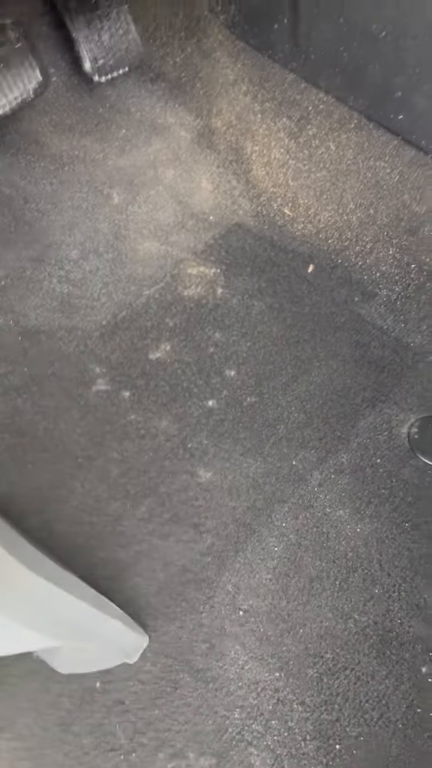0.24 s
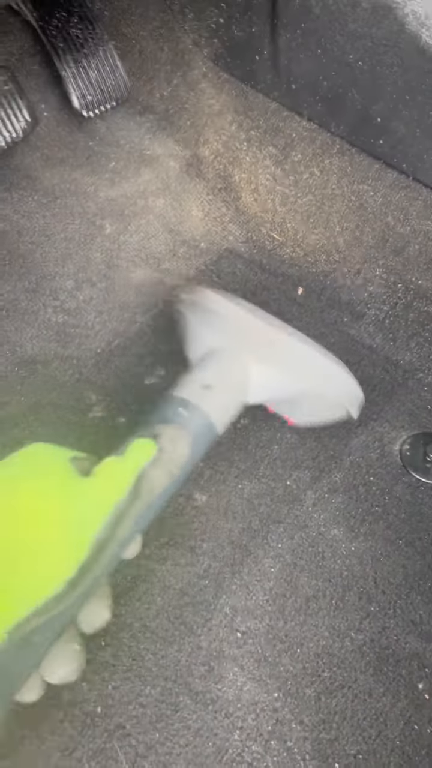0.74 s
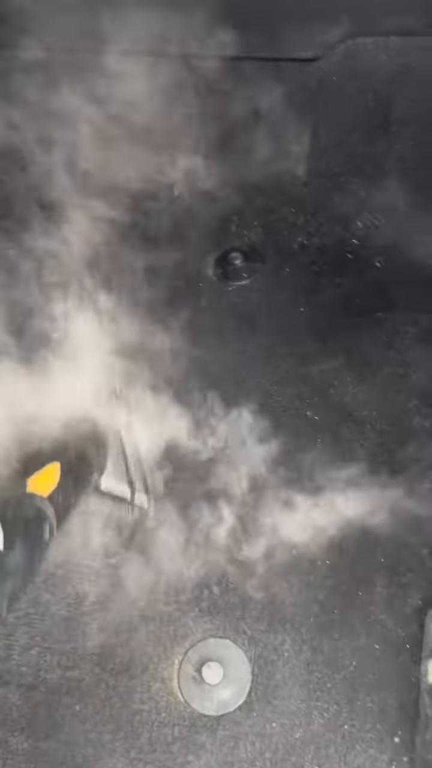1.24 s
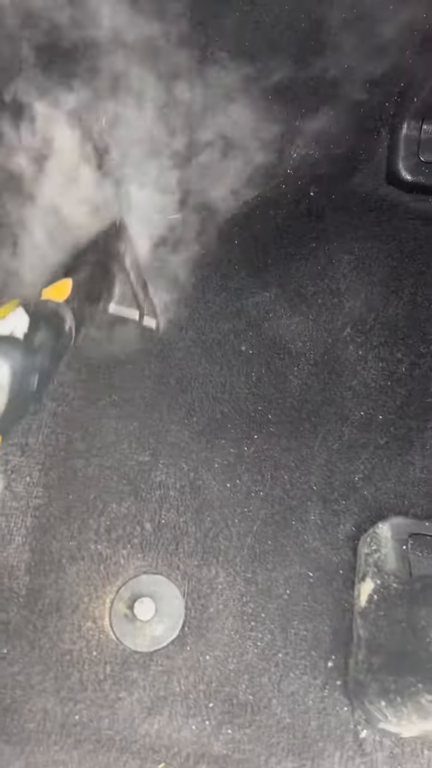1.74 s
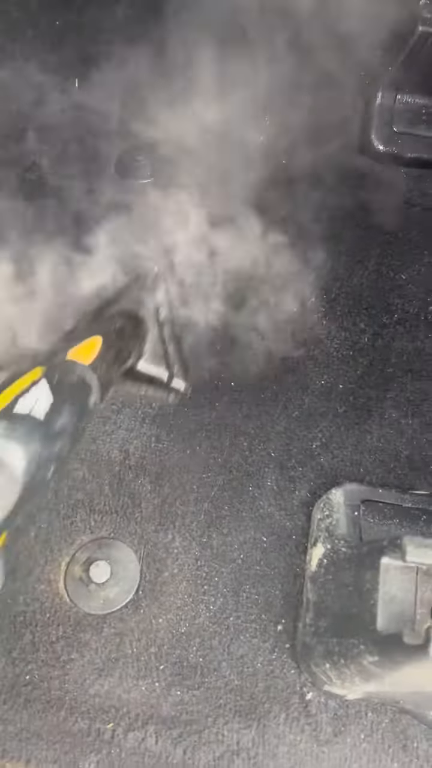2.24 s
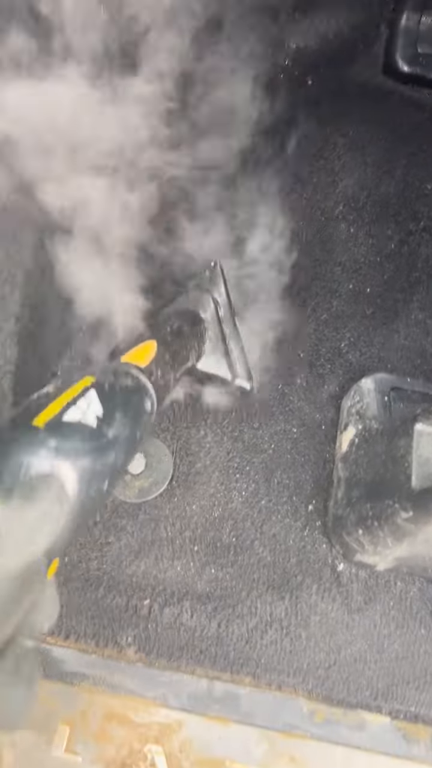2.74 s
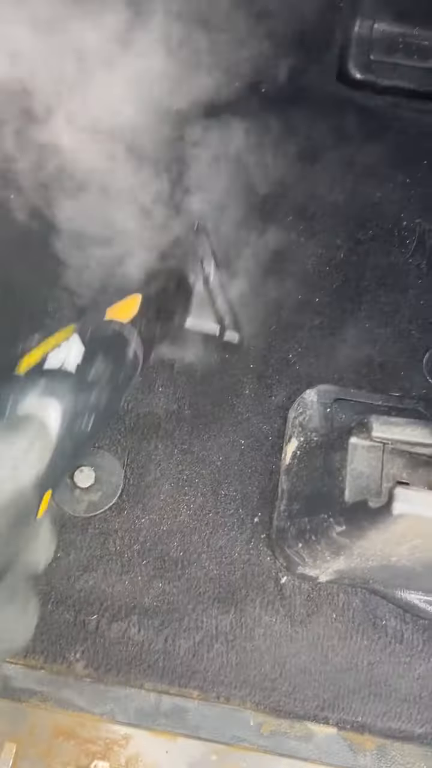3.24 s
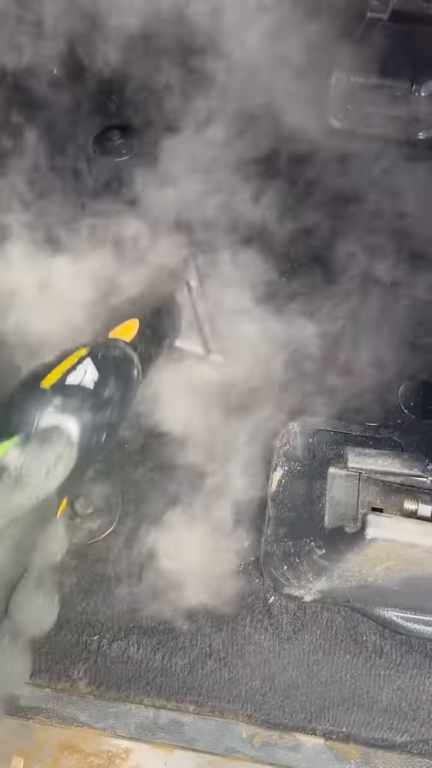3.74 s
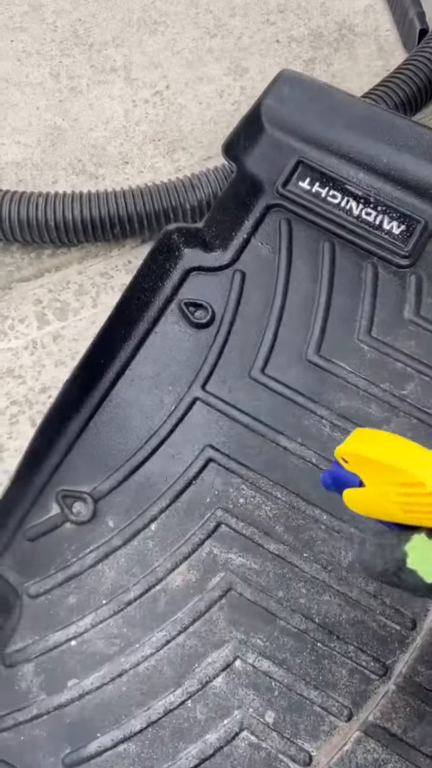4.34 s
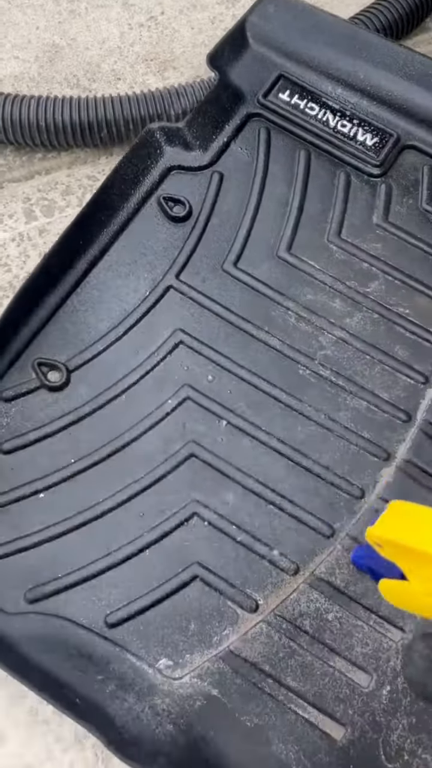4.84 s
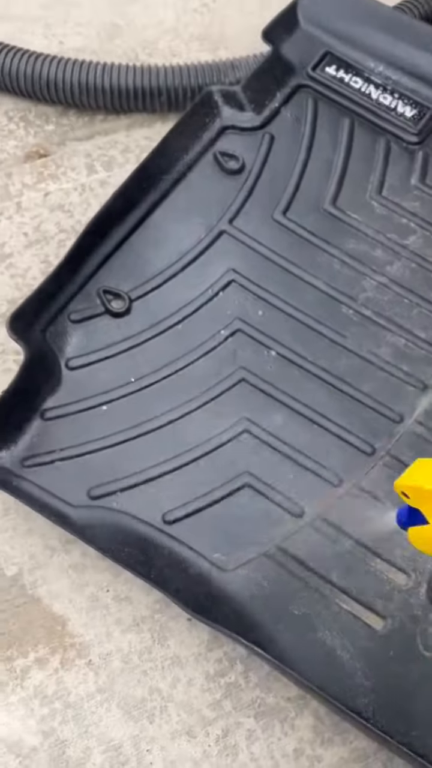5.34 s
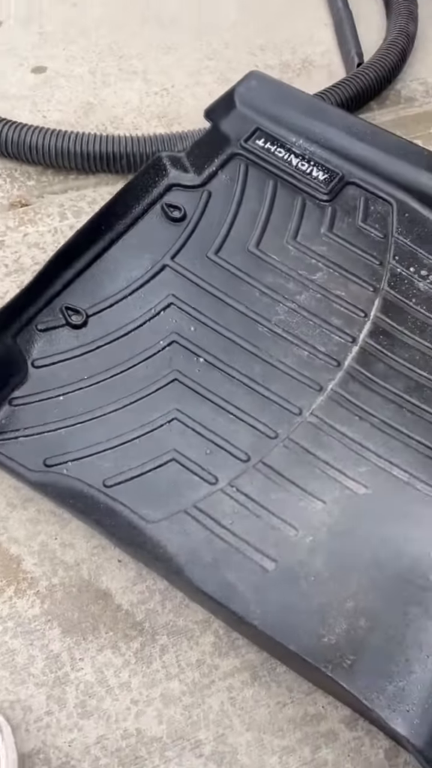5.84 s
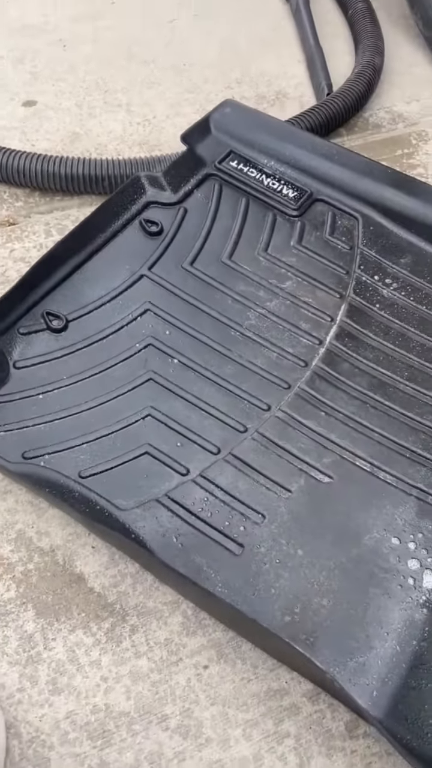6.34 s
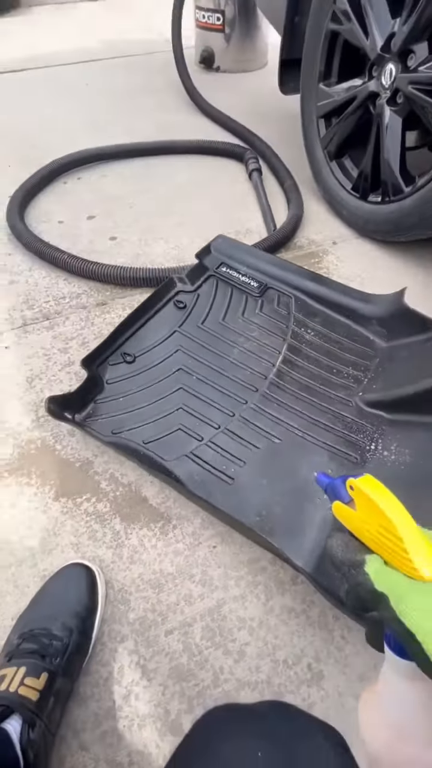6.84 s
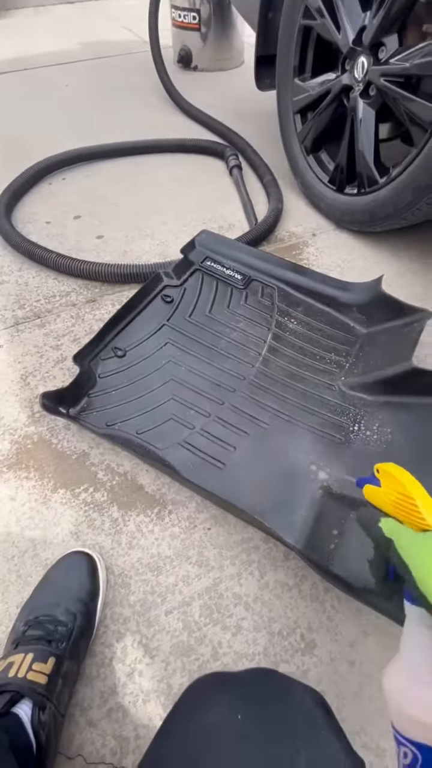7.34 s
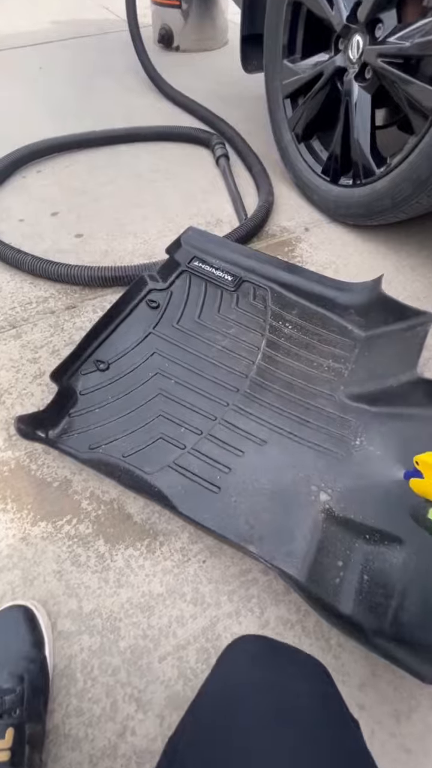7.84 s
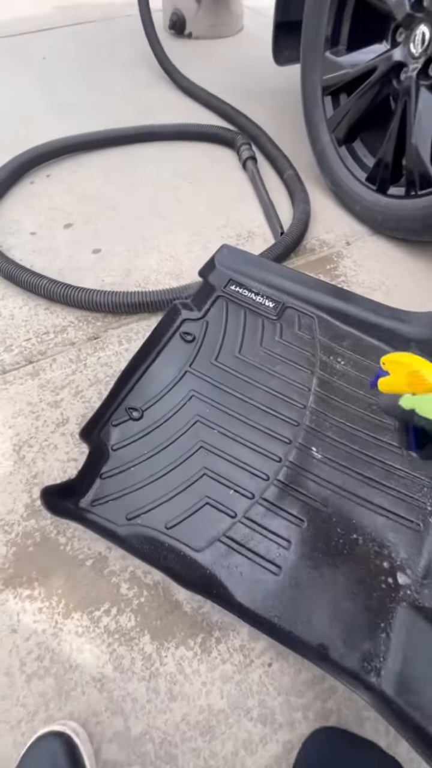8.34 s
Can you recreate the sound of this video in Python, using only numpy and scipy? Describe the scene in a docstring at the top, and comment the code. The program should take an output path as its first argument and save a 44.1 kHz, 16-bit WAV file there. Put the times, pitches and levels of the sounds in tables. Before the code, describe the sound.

Three close-miked cleaning jobs follow one another with hard cuts. First, under a second of vacuum air and faint motor hum over carpet; next, three seconds of forceful, sputtering steam in a footwell, its hiss swelling and shifting with each stroke; finally, an open yard where a trigger sprayer puffs mist, clicks back and fizzes as it refills, above low traffic, engine rumble and gusts buffeting the microphone.

```python
"""Cleaning a car, inside and out

Three places in turn. In the cabin a vacuum nozzle is drawn over the carpet: shaped noise and a motor tone.
In the footwell a steam brush scrubs: noise through combs that slide as the nozzle moves.
Outdoors a trigger bottle mists a rubber mat: swelling noise, with ringing modes for the close plastic knocks.
Behind it lie distant traffic, engine tones and wind on the two-port microphone."""
import sys
import numpy as np
from scipy import signal
from scipy.fft import rfft, irfft
from scipy.io import wavfile
from scipy.ndimage import uniform_filter1d

SR = 44100
rng = np.random.default_rng(int(sys.argv[2]) if len(sys.argv) > 2 else 0)


def file_out(sig):
    """Save sig as 16-bit WAV at sys.argv[1]."""
    # one column per channel
    cols = np.atleast_2d(sig).T
    # limit, then scale
    lim = np.clip(cols, -1, 1)
    pcm = np.round(lim * 32767).astype(np.int16)
    wavfile.write(sys.argv[1], SR, pcm)


N = 378378

TIME = np.arange(N) / SR
# noise is shaped in frames of 1024 samples, 256 apart
FRAME_S = np.arange(N // 256 + 5)[:, None] * 256 / SR
BIN_HZ = np.fft.rfftfreq(1024, 1 / SR)


# air in the vacuum hose, and air torn through the pile: (frequency [Hz], relative level per Hz [dB])
HOSE_SPECTRUM = [(25, -7), (70, -4), (250, -7.5), (480, -5.5), (650, -5.5), (1000, -9), (1220, -12.5),
                 (1500, -4.5), (1900, -12.5), (2500, -9.5), (4200, -20.5), (5800, -23), (8000, -19),
                 (15500, -28.5)]
PILE_SPECTRUM = [(150, -10), (450, -5), (700, -8.5), (1050, -5), (1800, -3), (2300, 5), (3100, 3),
                 (4100, -4.5), (5700, 2.5), (7800, -4.5), (9800, -1.5), (13500, -3), (15500, -4.5)]
# suction through the pile: (time [s], relative level [dB])
PILE_SUCTION = [(0.0, -35.5), (0.268, -31.5), (0.346, -25.5), (0.612, -23.5), (0.86, -24.5)]
# the nozzle mouth rings as its gap to the carpet changes:
# (time [s], spread in time [s], frequency [Hz], width [octaves], relative level [dB])
MOUTH_RINGS = [(0.193, 0.17, 1480, 0.095, -35.5), (0.363, 0.053, 1590, 0.13, -26.5),
               (0.434, 0.079, 1010, 0.18, -32), (0.605, 0.039, 2290, 0.094, -23),
               (0.702, 0.06, 2460, 0.082, -29), (0.836, 0.057, 1680, .22, -30.5)]
# vacuum motor: (frequency [Hz], level [dB])
MOTOR_TONES = [(330, -42)]


def vacuum():
    """Steady hose air and motor; the pile hisses when the nozzle meets it, and the mouth rings."""
    hose = amp(-35.0) * colour(HOSE_SPECTRUM)
    suction_db, = at_s(PILE_SUCTION, FRAME_S)
    contact = np.maximum(amp(suction_db) - amp(-40.5), 0)
    pile = amp(3.5) * contact * colour(PILE_SPECTRUM)
    mouth_power = 0
    for s, spread_s, hz, octaves, db in MOUTH_RINGS:
        mouth = amp(db) * swell(FRAME_S, s, spread_s) * unit(hump(hz, octaves))
        mouth_power = mouth_power + mouth ** 2
    uneven_db = 3.85 * patches(size=(26, 4))
    air = indoors(np.sqrt(hose ** 2 + pile ** 2 + mouth_power) * amp(uneven_db))
    motor = hum(MOTOR_TONES, drift=0.0012, flutter_db=0.4)
    return air * amp(0.86 * wander(94)) + motor


# steam jet: (frequency [Hz], relative level per Hz [dB])
JET_SPECTRUM = [(100, -18.5), (350.0, -17), (700.0, -13), (1100.0, -6.5), (1500.0, -2.5), (2000.0, -3.0),
                (2700.0, 0.0), (3200.0, -5.0), (3800.0, -10), (5000.0, -7.5), (6500.0, -7.5), (8200.0, -15),
                (10000.0, -9), (12500.0, -15.5), (13800.0, -17.5), (15500, -37)]
# loudness and colour of the jet: (time [s], relative level [dB], treble lift [dB], body lift [dB],
# lift of the rasp above 4 kHz [dB])
JET_COLOUR = [(0.89, -15.5, -7, 0.5, 3.5), (0.94, -12.5, -8, -5.5, -3.5), (1.05, -17.5, -1.5, 1, -0.5),
              (1.09, -23.5, -3, 4, 4.5), (1.16, -21.5, -2.5, 4.5, 0.5), (1.31, -20, 2.5, 5, 0),
              (1.42, -20.5, 0, 3.5, 0.0), (1.47, -24, 5, 9, -1.0), (1.56, -26.5, -1, 10, 4.5),
              (1.66, -25, 5, 8, 3), (1.73, -19, 0, -3.5, -1), (1.8, -18.5, -0.5, 1, 1),
              (1.93, -15.0, -4.5, -0.5, -6.5), (2.05, -15.5, -1.5, -2.5, -1.5), (2.1, -21, -5.5, 3.5, 2.5),
              (2.27, -18.5, -5.0, 0, 1), (2.38, -23.5, 3, 4, 1), (2.47, -26.5, 7, 2.5, 1),
              (2.56, -23.5, 1.5, 2.0, 1.5), (2.66, -18, -3, -4, -5.5), (2.79, -16.5, -6, -3.5, 2.0),
              (2.9, -21, -5, 0, -3), (3.0, -21, -3.5, 1.0, -2.5), (3.08, -28.5, 5, 3, 0.5),
              (3.15, -22.5, -3, -3, 0), (3.22, -20, -5, -3.5, -1), (3.33, -18, -3, -2, -3),
              (3.45, -18.0, -0.5, -3, 0.5), (3.56, -19, 0.5, -2, -0.5), (3.69, -21.5, -1, -0.5, -0.5),
              (3.8, -20.5, -0.5, -6, 0.5), (3.99, -21.5, 0, -3, 0.5)]
# hollow between brush and carpet, a peak with a notch under it: (time [s], peak [Hz], lift [dB])
BRUSH_HOLLOW = [(0.89, 2190.0, 3), (1.3, 2210.0, 2), (1.42, 2020.0, 3.5), (1.55, 2460.0, 4.5),
                (1.68, 1940.0, 7), (1.76, 1560.0, 0.5), (1.87, 1230.0, -2.0), (2.1, 1140.0, 2.5),
                (2.3, 1370.0, 0), (2.45, 1710.0, 8), (2.58, 1500.0, 0.5), (2.8, 1330.0, -1.5),
                (3.0, 1720.0, 0.5), (3.1, 1770.0, 1), (3.25, 2160.0, 2), (3.5, 2160.0, 3.0),
                (3.7, 2100.0, 2.5), (3.99, 1880.0, 2.5)]
# the jet whistles faintly on the brush's edge: (time [s], spread in time [s], frequency [Hz], lift [dB])
EDGE_WHISTLES = [(1.01, 0.044, 5000, 10), (1.09, 0.049, 4600, 5), (1.24, 0.086, 4250, 7),
                 (1.98, 0.032, 5020, 14), (2.798, 0.044, 5300, 3), (3.898, 0.044, 4230, 9)]
# strokes of the brush: (time [s], lag of the reflection off the footwell [ms])
STROKE_LAGS = [(0.89, 1.65), (1.05, 1.74), (1.32, .97), (1.42, .5), (1.55, .53), (1.68, .55), (1.78, 1.27),
               (1.9, 1.8), (2.04, 2.0), (2.16, 1.8), (2.33, 1.37), (2.45, 1.15), (2.56, 1.21), (2.72, 1.76),
               (2.84, 2.08), (3.1, 1.56), (3.27, 1.83), (3.48, 2.2), (3.68, 1.84), (3.85, 1.61),
               (3.99, 1.8)]
# clouds of steam reaching the microphone: (time [s], level [dB], spread in time [s])
STEAM_PUFFS = [(1.047, -35, 0.1), (1.3, -34, 0.037), (1.44, -33, 0.042), (1.77, -43, 0.089),
               (2.007, -35.5, 0.028), (2.15, -35.5, 0.031), (2.675, -33, 0.05), (3.674, -27, 0.05)]


def steam():
    """A sputtering jet; its reflections make combs that slide with the nozzle."""
    jet_db, treble_db, body_db, rasp_db = at_s(JET_COLOUR, FRAME_S)
    treble = 1 / (1 + (5200 / (BIN_HZ + 1)) ** 4)
    tilt_db = treble_db * treble + body_db * hump(440, 1.0) + rasp_db * hump(4600, 0.31)
    hollow_hz, lift_db = at_s(BRUSH_HOLLOW, FRAME_S)
    hollow_db = lift_db * (hump(hollow_hz, 0.18) - 1.1 * hump(0.63 * hollow_hz, 0.25))
    whistle_db = sum(db * swell(FRAME_S, s, spread_s) * hump(hz, 0.03)
                     for s, spread_s, hz, db in EDGE_WHISTLES)

    lag_ms = uniform_filter1d(at_s(STROKE_LAGS, FRAME_S)[0], size=9, axis=0)
    turn = 2j * np.pi * BIN_HZ * lag_ms / 1000
    # the footwell wall reflects the middle of the hiss best
    near = 0.38 * hump(2300, 1) * np.exp(turn)
    # later reflections from the cabin, each path lengthening or shortening as the nozzle moves
    paths = zip(rng.uniform(.002, .012, size=14), rng.uniform(0, 1.5, size=14))
    echoes = sum(np.exp(2j * np.pi * BIN_HZ * lag_s + slide * turn) for lag_s, slide in paths)
    far = .14 * hump(3800, 1.8) * echoes

    swirl_db = 1.8 * patches(size=(20, 3))
    # coarse eddies, strongest in the rasp of the jet
    eddies_db = (.8 + 1.4 * hump(3600, .7)) * patches(size=(5, 14))
    shape_db = jet_db + tilt_db + hollow_db + whistle_db + swirl_db + eddies_db
    jet = indoors(colour(JET_SPECTRUM) * abs(1 + near) * abs(1 + far) * amp(shape_db - 1.33))
    # droplets of condensate break up the jet, and it surges unevenly
    sputter_db = 0.7 * wander(125)
    surge_db = 0.6 * wander(31)
    # a draught of -47 dB blows between the clouds
    return jet * amp(sputter_db + surge_db) + buffets(gusty(-47, STEAM_PUFFS))


# atomised spray: (frequency [Hz], relative level per Hz [dB])
MIST_SPECTRUM = [(500, 1.5), (1000, 0.5), (1700, -7.5), (2600, 4), (3800, -1), (5400, -6.5), (6700, 0),
                 (8200, -1), (10000, -2), (15500, 1)]
# one squeeze a row: (time of full pressure [s], relative level [dB], rise [s], fall [s],
# sizzle lift near 5 kHz [dB], patter on the mat [dB], patter frequency [Hz])
SPRAY_SQUEEZES = [(4.115, -31.5, 0.12, 0.062, 7, -12.5, 1800), (4.64, -32, 0.1, 0.075, 8, -12, 1550),
                  (5.22, -32.5, 0.11, 0.092, 9, -10.5, 1730), (5.755, -34, 0.076, 0.068, 7.5, -7.5, 1050),
                  (7.19, -35, 0.099, 0.084, 8, -14, 1437), (7.731, -36.5, 0.081, 0.11, -3.5, -14.5, 1510),
                  (8.094, -36, 0.076, 0.059, 3, -14.5, 1605), (8.441, -38.5, 0.087, 0.079, 8.5, -10, 1530)]


def spray():
    """Each squeeze swells into a hiss of mist, and the droplets patter on the mat."""
    power = 0
    for s, db, rise, fall, sizzle_db, patter_db, patter_hz in SPRAY_SQUEEZES:
        u = (FRAME_S - s) / np.where(FRAME_S < s, rise, fall)
        flow = amp(db) / (1 + abs(u) ** 3 + (u / 1.5) ** 10)
        mist = amp(-5.5 + sizzle_db * hump(5270, 0.22)) * colour(MIST_SPECTRUM)
        patter = amp(patter_db) * unit(hump(patter_hz, 0.8))
        power = power + flow ** 2 * (mist ** 2 + patter ** 2)
    uneven_db = 1.2 * patches(size=(20, 4)) + 1.6 * patches(size=(3, 16))
    # the hiss bounces off the mat, close under the nozzle
    bounce_ms = 0.61
    bounce = 0.27 * hump(3600, 1) * np.exp(2j * np.pi * BIN_HZ * bounce_ms / 1000)
    return outdoors(np.sqrt(power) * abs(1 + bounce) * amp(uneven_db)) * amp(0.4 * wander(200))


# creaks of the pulled trigger: (time [s], relative level [dB], slips in the run, gap between slips [s])
TRIGGER_CREAKS = [(4.419, -30, 1, 0), (4.444, -32, 2, .008), (4.951, -27, 1, 0), (4.974, -40, 1, 0),
                  (5.001, -28.5, 2, 0.0088), (5.569, -38, 1, 0), (5.638, -40, 2, 0.016), (6.002, -43, 1, 0),
                  (7.01, -41, 2, 0.03), (7.356, -46, 1, 0), (7.533, -43, 1, 0), (7.565, -29, 1, 0),
                  (7.586, -29.5, 2, .018), (7.98, -27, 3, 0.012), (8.328, -33.5, 1, 0),
                  (8.344, -27.5, 3, 0.0092)]
# knocks of the trigger: (time [s], head relative level [dB], pitch factor of head and stop,
# bottle relative level [dB], stop relative level [dB])
TRIGGER_KNOCKS = [(4.2315, -26.5, 0.97, -42, -31), (4.236, -31, 0.98, -45, -33),
                  (4.709, -42, 1.0, -30, -52), (4.732, -29, 0.874, -31, -50), (4.7352, -41, 1.0, -34, -50),
                  (4.76, -42, 1.05, -37, -48), (5.322, -31, .97, -36, -41), (5.355, -26.5, 1.03, -50, -37),
                  (5.359, -40, 1.2, -49, -44), (5.402, -53, 1.2, -33, -61),
                  (7.0108, -32, 1.03, -33.5, -23.5), (7.389, -44, 1.0, -36, -58),
                  (7.396, -45, 0.89, -37, -55), (7.469, -54, 1.1, -33, -52), (7.55, -39, 1.14, -35, -41),
                  (7.586, -44, 0.9, -49, -45), (7.981, -36, .95, -40, -46), (8.004, -38, .95, -43, -48),
                  (8.346, -37, 0.97, -39, -45), (8.365, -37, .9, -35, -48), (8.549, -26, 0.95, -47, -35)]
# modes of the pivot, its stop, the spray head and the half-full bottle:
# (frequency [Hz], relative level [dB], time to fall 60 dB [s])
PIVOT_MODES = [(1100, -18, .012), (1570, -6, .012), (2400, -19, 0.006), (5500, -7, 0.02),
               (6660, 5.5, 0.016), (8400, -1, 0.0082), (11900, 7, 0.017), (14000, 15, 0.0082)]
STOP_MODES = [(3030, 4, 0.011), (3280, -7, 0.011), (6150, -4, 0.0074), (7300, -16, .006)]
HEAD_MODES = [(1680, 1, 0.02), (1950, 2.5, 0.016), (2340, -4, 0.013), (2650, 2.5, 0.02), (4260, -8, 0.014),
              (4700, -1.5, 0.023), (8400, -3, .008)]
BOTTLE_MODES = [(567, 5, 0.018), (797, 8, 0.013), (1020, -1.5, 0.015), (1700, 4.5, 0.024), (1980, -2, .012),
                (3430, -16, 0.0074)]
# gritty tick of the pull, and a knock's scatter off mat and ground:
# (frequency [Hz], relative level per Hz [dB])
TICK_SPECTRUM = [(700, -7), (1500, -1), (2500, -4.5), (4000, -13.5), (5500, 5), (7000, 1), (9000, 0),
                 (12000, -3), (15500, -1)]
KNOCK_SPECTRUM = [(600, 1), (1200, -4), (1700, -2), (3000, 5), (3700, -11), (4600, -1), (6500, -7),
                  (9000, -12), (15500, -19)]


def trigger():
    """The plastic sticks and slips in ticks when pulled, and knocks head and bottle as it springs back."""
    slips = [(start + k * gap, db) for start, db, count, gap in TRIGGER_CREAKS for k in range(round(count))]
    direct = np.zeros(N)
    for s, db in slips:
        pitch = 1 + .03 * rng.standard_normal()
        add(direct, s, amp(db + 1.5) * ring(PIVOT_MODES, pitch, scatter_db=2.5))
    for s, head_db, pitch, bottle_db, stop_db in TRIGGER_KNOCKS:
        add(direct, s, amp(stop_db) * ring(STOP_MODES, pitch, scatter_db=1.2))
        add(direct, s, amp(head_db) * ring(HEAD_MODES, pitch, scatter_db=1.5))
        add(direct, s, amp(bottle_db) * ring(BOTTLE_MODES, 1, scatter_db=1.4))
    s, db = np.transpose(slips)
    ticks = snaps(s, db + 4.0, ring_s=0.023, tail_db=-13.5, tail_s=0.1)
    grit = outdoors(colour(TICK_SPECTRUM)) * ticks
    s, db = np.transpose(TRIGGER_KNOCKS)[:2]
    bursts = snaps(s, db - 12, ring_s=0.015, tail_db=2.5, tail_s=0.1)
    scatter = outdoors(colour(KNOCK_SPECTRUM)) * bursts
    return ports(direct) + grit + scatter


# the pump refilling after a squeeze: (time [s], relative level [dB], spread in time [s])
PUMP_REFILLS = [(4.28, -38.5, 0.05), (4.813, -38, 0.13), (5.428, -41.5, 0.087), (5.904, -44, 0.065),
                (6.248, -47, 0.23), (7.415, -35.5, 0.053), (7.877, -42, 0.058), (8.224, -41, 0.095)]


def refill():
    """Liquid fizzes back through the pump valve, and its bubbles rattle the bottle."""
    flow = sum(amp(db) * swell(TIME, s, spread_s) for s, db, spread_s in PUMP_REFILLS)
    fizz = outdoors(unit(hump(750, 1.4) + 0.2 * hump(6200, 0.84)))
    bubbles = np.zeros(N)
    count = int(200 * N / SR)  # 200 bubbles a second, heard only while the pump flows
    draws = rng.uniform([0, .8, 0], [N / SR - .01, 1.25, 1], size=(count, 3))
    for s, pitch, size in draws:
        add(bubbles, s, size * ring(BOTTLE_MODES, pitch, scatter_db=7))
    return flow * (fizz * amp(2.3 * wander(200) - 11.0) + amp(-6.5) * ports(bubbles))


# the rubber mat flopping: (time [s], peak level [dB], frequency [Hz])
MAT_FLOPS = [(4.13, -36.5, 350), (8.453, -35, 318)]


def flops():
    """Soft, hollow bumps of the mat: short tones of wavering pitch."""
    return sum(amp(db) * np.exp(-abs(TIME - s) / 0.0094) * tone(hz * (1 + 0.0884 * wander(66)))
               for s, db, hz in MAT_FLOPS)


# distant traffic: (frequency [Hz], relative level per Hz [dB])
YARD_SPECTRUM = [(200, -1.5), (350, -8), (550, -12.5), (900, -19), (1250, -18), (1600, -26), (1950, -21),
                 (3000, -28), (3700, -27), (4600, -31.5), (8000, -38), (15000, -50)]
# a vehicle pulling away: (time [s], firing frequency [Hz], mean level [dB])
VEHICLE_PASS = [(4.7, 56.16, -48), (5.0, 62.3, -38.5), (5.2, 70.9, -32.5), (5.41, 89.6, -37),
                (5.5, 86.4, -35), (5.8, 80, -36.5), (6.25, 94.3, -34.5), (6.5, 98, -55)]
# idling engine: (frequency [Hz], relative level [dB])
IDLE_TONES = [(48, -44), (96, -40.5), (143, -45), (240, -59)]
# the idle fades as the microphone turns away: (time [s], gain [dB])
IDLE_GAIN = [(4.0, -1), (7.4, -2), (7.9, -8.5)]
# the breeze rises and dies away: (time [s], relative level [dB])
BREEZE_LEVEL = [(4.0, -34.5), (4.7, -36), (5.6, -26.5), (6.1, -39), (7.5, -29.5), (7.8, -39), (8.55, -37)]
# gusts on top of it: (time [s], relative level [dB], spread in time [s])
WIND_GUSTS = [(4.79, -29, 0.018), (5.397, -18, 0.022), (5.852, -25.5, 0.12), (6.287, -22.5, 0.077),
              (6.454, -20, 0.024), (6.586, -21, 0.0092), (6.884, -25, 0.083), (7.3, -24, 0.042)]


def yard():
    """Distant traffic, an idling engine, a vehicle pulling away and gusts."""
    drift_db = 2.2 * patches(size=(30, 5))
    air = outdoors(amp(-41.0) * colour(YARD_SPECTRUM) * hump(850, 1.78) * amp(drift_db))
    firing_hz, vehicle_db = at_s(VEHICLE_PASS, TIME)
    exhaust = amp(vehicle_db + 2 * wander(24)) * tone(firing_hz)
    idle = hum(IDLE_TONES, drift=0.006, flutter_db=1.8) * amp(at_s(IDLE_GAIN, TIME)[0])
    wind = buffets(gusty(at_s(BREEZE_LEVEL, TIME)[0], WIND_GUSTS) - 2.5)
    return air + exhaust + idle + wind


# moving air on the microphone: (frequency [Hz], relative level per Hz [dB])
WIND_SPECTRUM = [(15, -22.5), (30, -13.5), (46, 3.5), (65, -1.5), (88, 4.5), (115, -16), (142, -2),
                 (175, -9), (240, -12), (400, -26.5)]


def buffets(level_db):
    """Low lumps of moving air on the microphone; the stronger the gust, the deeper it reaches."""
    strength_db = np.interp(FRAME_S, TIME, level_db) + 36.5
    depth_db = 0.61 * strength_db * hump(42.5, 0.66)
    x = outdoors(colour(WIND_SPECTRUM) * amp(depth_db) / (1 + (BIN_HZ / 420) ** 4))
    # level out the noise, so that it follows level_db
    power = uniform_filter1d((x ** 2).mean(0), size=3000)
    return amp(level_db) * x / np.sqrt(abs(power) + 1e-9)


def gusty(steady_db, gusts):
    """Level in dB of a flow of air with bell-shaped gusts on top."""
    power = amp(steady_db) ** 2 + sum((amp(db) * swell(TIME, s, spread_s)) ** 2 for s, db, spread_s in gusts)
    return 10 * np.log10(power)


def hum(lines, drift, flutter_db):
    """Tones of one machine whose speed wavers."""
    speed = 1 + drift * wander(8.3)
    return sum(amp(db + flutter_db * wander(12.0)) * tone(hz * speed) for hz, db in lines)


def tone(hz):
    """A sine of rms 1 that follows a pitch curve."""
    return np.sqrt(2) * np.sin(2 * np.pi * (np.cumsum(hz) / SR + rng.random()))


def ring(modes, pitch, scatter_db):
    """One blow on a plastic part, with the energy of rms 1 over a millisecond; mode levels vary by chance."""
    t = np.arange(SR // 16) / SR
    x = 0
    for hz, db, t60 in modes:
        decay = amp(db + scatter_db * rng.standard_normal() - 60 * t / t60)
        x = x + decay * np.sin(2 * np.pi * (hz * pitch * t + rng.random()))
    # plastic yields, so a blow takes a moment to build
    contact_s = 0.00029
    x = x * (1 - np.exp(-(t / contact_s) ** 2))
    return x / np.sqrt(np.sum(x ** 2) * 1000 / SR)


def snaps(s, db, ring_s, tail_db, tail_s):
    """Envelope of plastic clicks: each a brief ring, then scatter off the mat and ground."""
    t = np.arange(SR // 4) / SR
    decay = amp(-60 * t / ring_s) ** 2 + amp(tail_db - 60 * t / tail_s) ** 2
    power = decay * (1 - np.exp(-t / 0.00053))
    blows = np.zeros(N)
    blows[np.round(s * SR).astype(int)] = amp(db) ** 2
    return np.sqrt(abs(signal.oaconvolve(blows, power)[:N]))


def add(mix, s, sound):
    """Mixes a sound in at time s."""
    part = mix[round(s * SR):][:len(sound)]
    part += sound[:len(part)]


def ports(x):
    """A close, direct sound reaches the two microphone ports one sample apart, left first."""
    return np.array([x, np.roll(x, 1)])


# phase between the microphone ports: (frequency [Hz], lead of the left [rad])
PHASE_LEAD = [(0, 0), (400, -.35), (1300, -.45), (1800, 0), (2600, 2.4), (3200, 2.2), (4000, 1),
              (5000, 1.3), (6000, 3.1), (8100, 6.3), (10300, 9.4), (12500, 12.6), (14700, 15.7),
              (16000, 16.5)]


def hiss(gain, likeness, balance):
    """Turbulent noise with a gain per frame and bin, as the two microphone ports hear it."""
    a, b, c, d = rng.standard_normal((4, len(FRAME_S), len(BIN_HZ)))
    same = np.clip(at_hz(likeness), 0, 1)
    left = a + 1j * b
    right = (same * left + np.sqrt(1 - same ** 2) * (c + 1j * d)) * np.exp(-1j * at_hz(PHASE_LEAD))
    lean = amp(at_hz(balance) / 2)
    z = np.array([left * lean, right / lean]) * gain
    x = signal.istft(z.swapaxes(1, 2), nperseg=1024, noverlap=768)[1]
    return x[:, :N] / np.sqrt(1024 / 3)


# cabin at the two ports: (frequency [Hz], likeness [0 to 1]), (frequency [Hz], left over right [dB])
CABIN_PORT_LIKENESS = [(100, 1), (500, 0.91), (1300, 0.87), (2600, 1), (3900, 0.33), (5800, 1), (15000, 1)]
CABIN_PORT_BALANCE = [(200, -0.5), (500, 0.5), (1000, 4.5), (1700, 0), (2700, -2), (4000, 0), (4800, -1.5),
                      (6000, -1)]


def indoors(gain):
    """Noise from a source in the cabin."""
    return hiss(gain, CABIN_PORT_LIKENESS, CABIN_PORT_BALANCE)


# open air at the two ports: (frequency [Hz], likeness [0 to 1]), (frequency [Hz], left over right [dB])
YARD_PORT_LIKENESS = [(40, 0.58), (90, 1), (200, 0.66), (900, 0.025), (1900, 0.58), (3800, 0.075),
                      (6000, 1), (15000, 1)]
YARD_PORT_BALANCE = [(200, 0.5), (900, -3), (2000, 0), (3600, -2), (6000, 0)]


def outdoors(gain):
    """Noise with the stereo image of open air."""
    return hiss(gain, YARD_PORT_LIKENESS, YARD_PORT_BALANCE)


def amp(db):
    """Decibels to gain."""
    return 10 ** (np.asarray(db) / 20)


def unit(x):
    """Scales to rms 1."""
    return x / np.sqrt(np.mean(abs(x) ** 2) + 1e-20)


def at_hz(points, hz=BIN_HZ):
    """Reads a table on a log-frequency axis."""
    f, value = np.transpose(points)
    return np.interp(np.log(hz + 1), np.log(f + 1), value)


def at_s(rows, t):
    """Reads each column of a curve at the times t."""
    s, *columns = np.transpose(rows)
    return [np.interp(t, s, c) for c in columns]


def colour(points):
    """Gain per bin of a spectrum, scaled to rms 1."""
    return unit(amp(at_hz(points)))


def hump(hz, octaves):
    """A bell on the log-frequency axis, top 1."""
    return np.exp(-.5 * (np.log2((BIN_HZ + 1) / hz) / octaves) ** 2)


def swell(t, s, spread_s):
    """A bell in time, top 1."""
    return np.exp(-.5 * ((t - s) / spread_s) ** 2)


def wander(rate_hz):
    """Smooth chance of rms 1, fading out around the given rate."""
    f = np.fft.rfftfreq(N, 1 / SR)
    return unit(irfft(rfft(rng.standard_normal(N)) * np.exp(-(f / rate_hz) ** 2), N))


def patches(size):
    """Random patches of rms 1, size = (frames, bins)."""
    z = rng.standard_normal((len(FRAME_S), len(BIN_HZ)))
    return unit(uniform_filter1d(uniform_filter1d(z, size[0], axis=0), size[1], axis=1))


def scene():
    """Vacuum, then steam brush, then the mat outdoors, joined by quick crossfades."""
    steam_on_s, steam_off_s = 0.884, 3.999
    first = np.clip((TIME - steam_on_s) / 0.008 + .5, 0, 1)
    second = np.clip((TIME - steam_off_s) / 0.0034 + .5, 0, 1)
    mat = yard() + spray() + refill() + trigger() + flops()
    cabin = vacuum() * np.sqrt(1 - first) + steam() * np.sqrt(first * (1 - second))
    return cabin + mat * np.sqrt(second)


def record(dry):
    """The recorder's low cut at 34 Hz and band limit at 15.8 kHz."""
    x = signal.sosfilt(signal.butter(4, 34, "high", fs=SR, output="sos"), dry)
    band_limit = signal.firwin(511, 15800, window=("kaiser", 9), fs=SR)
    return signal.oaconvolve(x, band_limit[None], "same")


dry = scene()
out = record(dry)
file_out(out)
```